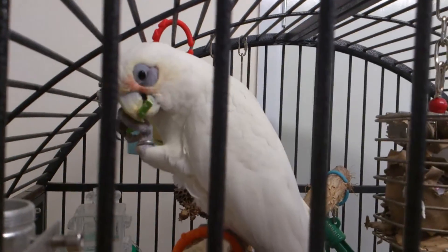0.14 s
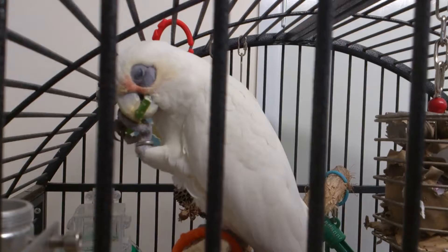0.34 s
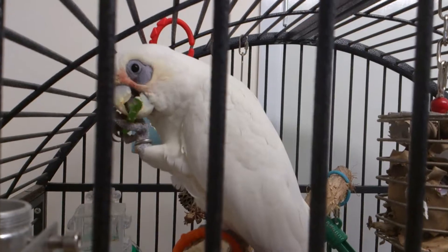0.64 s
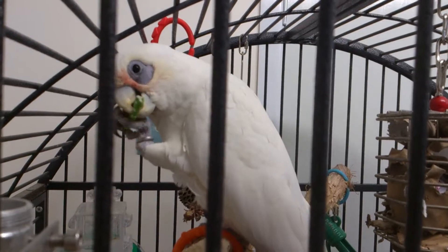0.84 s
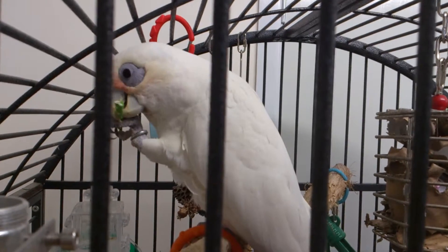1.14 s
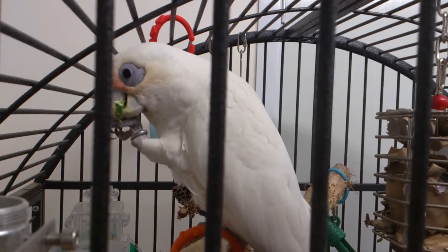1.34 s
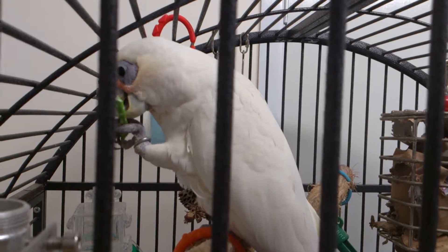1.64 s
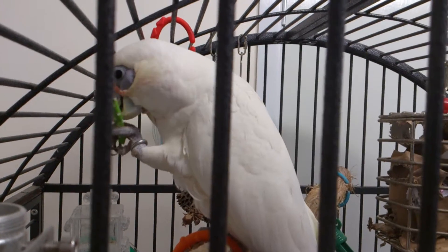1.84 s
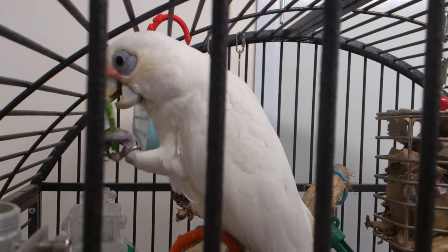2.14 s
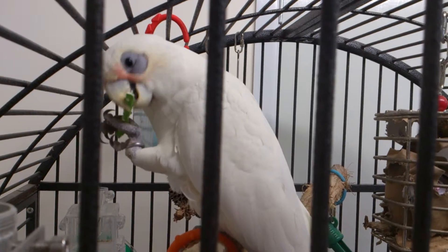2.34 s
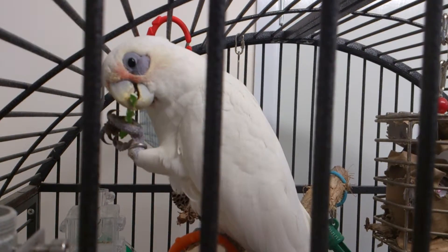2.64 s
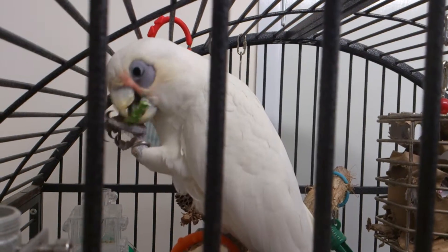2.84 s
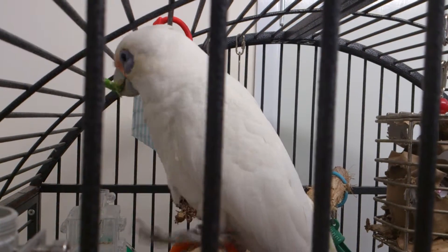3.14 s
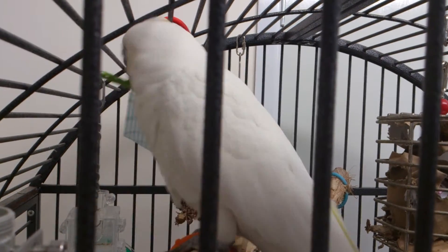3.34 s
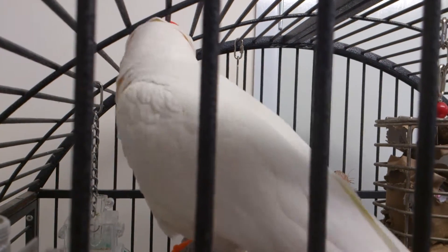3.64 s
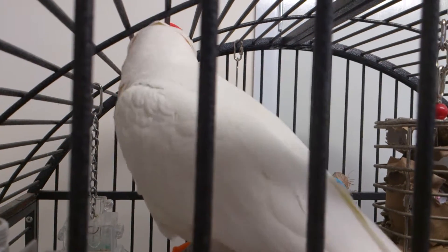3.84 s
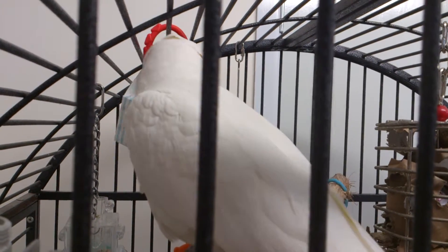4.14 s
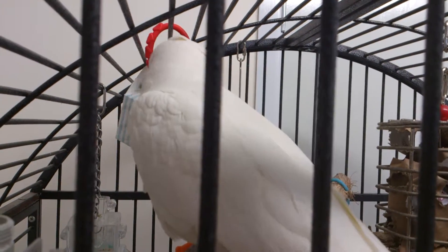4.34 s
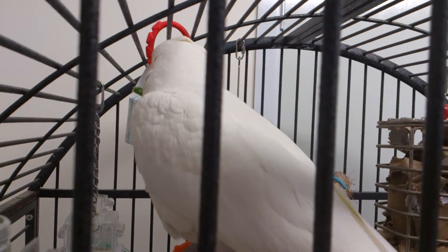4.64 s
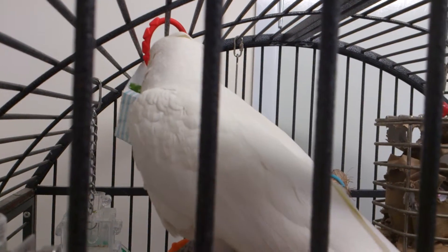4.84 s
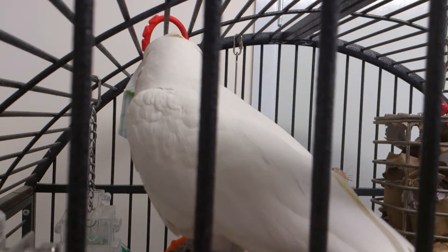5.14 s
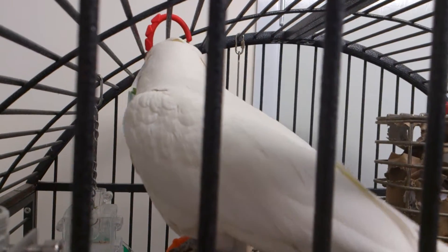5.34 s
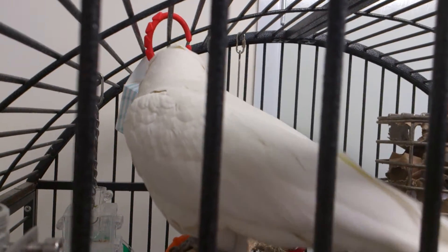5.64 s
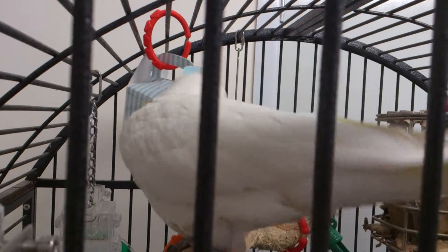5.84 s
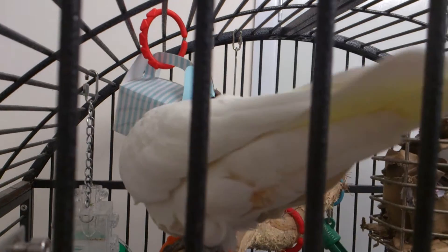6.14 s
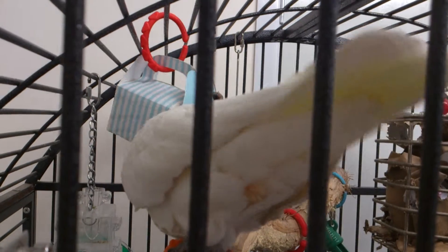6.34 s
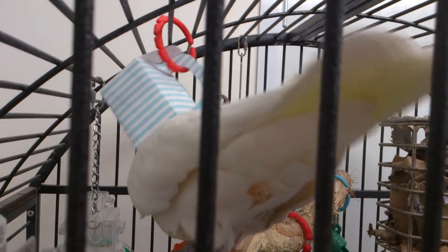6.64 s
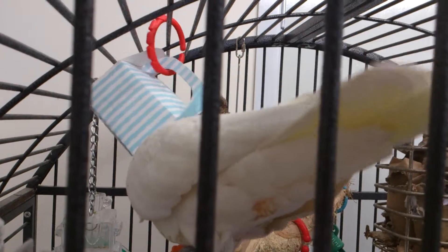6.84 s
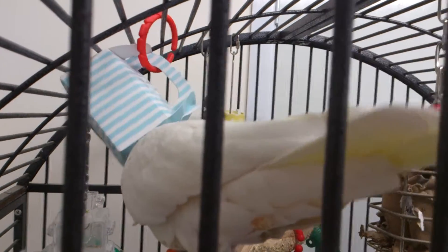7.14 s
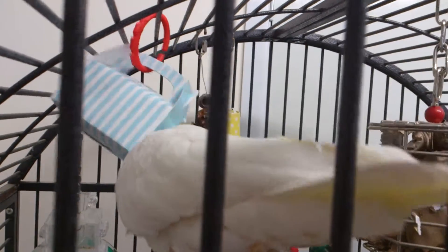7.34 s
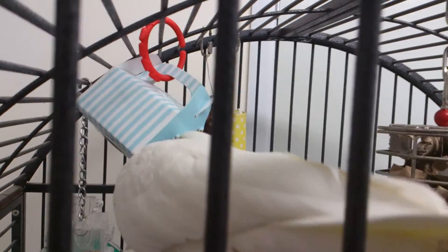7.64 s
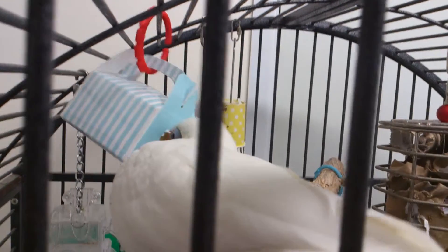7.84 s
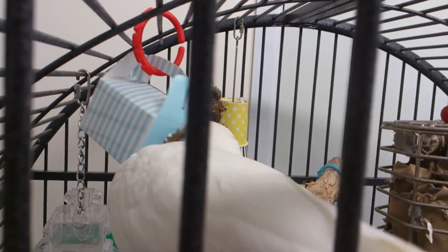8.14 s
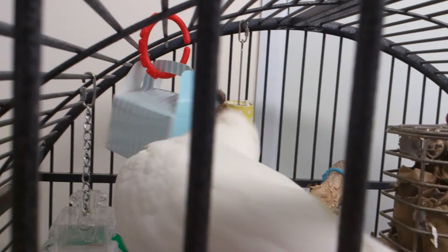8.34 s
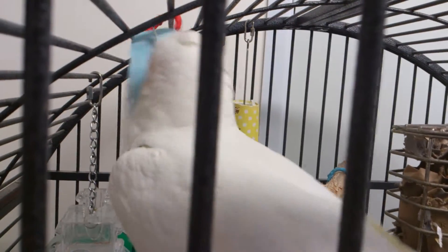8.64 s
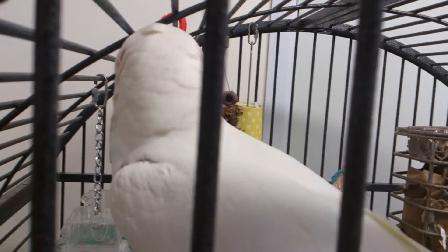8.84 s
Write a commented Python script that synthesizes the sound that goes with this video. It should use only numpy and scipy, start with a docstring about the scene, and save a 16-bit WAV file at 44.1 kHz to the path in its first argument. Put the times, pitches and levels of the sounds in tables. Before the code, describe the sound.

A caged parrot nibbles with small crisp beak clicks while another bird squeaks piercingly four times; then it snaps and knocks a hanging card box.

```python
"""A caged parrot nibbles a leaf while another bird, further off in a hard-walled room, gives four piercing squeaks:
two voices whistle and modulate each other. A toy creaks in narrow bands of noise; the nibbling is bursts of noise.
The parrot turns to a hanging card box, snaps at it, slams it once and knocks it about: duller, longer bursts.
Near the end the swinging box rustles in dense tiny creases and its chain jingles faintly in decaying sines.
Room air and a distant fan, both shaped noise, make a steady floor throughout."""
import sys
import numpy as np
from scipy import signal
from scipy.fft import rfft, irfft
from scipy.io import wavfile
from scipy.ndimage import uniform_filter1d, minimum_filter1d

SR = 44100
rng = np.random.default_rng(int(sys.argv[2]) if len(sys.argv) > 2 else 0)


def persist_wave(psi):
    """Save psi, clipped to +-1, as 16-bit WAV."""
    counts = np.round(np.clip(psi, -1, 1) * 32767).astype(np.int16)
    wavfile.write(sys.argv[1], SR, np.atleast_2d(counts).T)


N = 396900


def from_db(db):
    """Decibels to gain."""
    return 10 ** (np.asarray(db) / 20)


def rms_one(x):
    """Scale to rms 1."""
    return x / np.sqrt(np.mean(x ** 2) + 1e-20)


def peak_one(x):
    """Scale so that the loudest millisecond has rms 1."""
    return x / np.sqrt(uniform_filter1d(x ** 2, size=44).max())


def at_hz(points, hz):
    """Read a (frequency, value) table on a log frequency axis."""
    table_hz, values = np.array(points).T
    return np.interp(np.log(hz), np.log(table_hz), values)


def colour(x, spectrum):
    """Shape the spectrum of a sound by a (f/Hz, level/dB) curve, then scale to rms 1."""
    size = len(x)
    hz = np.maximum(np.arange(size // 2 + 1) * SR / size, 10)
    return rms_one(irfft(rfft(x) * from_db(at_hz(spectrum, hz)), size))


def butterworth(x, order, hz, kind="low"):
    """Smooth low, high or band pass."""
    return signal.sosfilt(signal.butter(order, hz, kind, fs=SR, output="sos"), x)


def resonance(x, hz, width_hz):
    """Two-pole band-pass, gain about 1 on top."""
    r = np.exp(-np.pi * width_hz / SR)
    zeros = [(1 - r * r) / 2, 0, (r * r - 1) / 2]
    poles = [1, -2 * r * np.cos(2 * np.pi * hz / SR), r * r]
    return signal.lfilter(zeros, poles, x)


def steep_resonance(x, hz, width_hz):
    """The same resonance twice in a row, for steep skirts."""
    return resonance(resonance(x, hz, width_hz), hz, width_hz)


def add(out, s, sound):
    """Mix a sound in at time s."""
    i = round(s * SR)
    out[i:i + len(sound)] += sound[:N - i]


def air():
    """Broad room noise with the soft hum bands of a fan: noise through narrow resonances."""
    # colour of the room air: (f/Hz, relative level/dB)
    air_colour = [(25, -20), (54, 1), (106, -5), (182, -2), (272, -0.5), (491, -9.5), (609, -6.5),
                  (1160, -11.5), (2270, -13), (3300, -18.5), (4940, -16), (8220, -30), (10200, -22.5),
                  (12000, -34), (13500, -37), (15200, -41)]
    # hum bands of the fan: (f/Hz, width/Hz, level/dB)
    fan_bands = [(189.6, 6.1, -62.5), (241.3, 12, -79), (284, 14, -63.5), (378.7, 31, -62), (611, 1.6, -65)]
    hum = sum(from_db(db) * rms_one(resonance(rng.standard_normal(N), hz, width)) for hz, width, db in fan_bands)
    return from_db(-48) * colour(rng.standard_normal(N), air_colour) + hum


def room(x):
    """Dense wall echoes that build up over some ms and die band by band, about equally strong at every
    frequency."""
    # time the echoes take to fall by 60 dB: (f/Hz, t60/s)
    echo_t60 = [(300, 0.32), (1000, 0.82), (3000, 0.78), (5000, 0.68), (10000, 0.5), (15000, 0.465)]
    build_up_s = 0.0017
    t, echoes = np.arange(SR) / SR, 0
    edges = 100 * 2 ** np.arange(0, 7.6, .5)   # half-octave bands from 100 Hz
    for low, high in zip(edges, edges[1:]):
        t60 = at_hz(echo_t60, np.sqrt(low * high))
        fade = from_db(-60 * t / t60) * (1 - np.exp(-t / build_up_s))
        band = butterworth(rng.standard_normal(SR), 2, [low, high], "band")
        echoes = echoes + band * fade / np.sqrt(np.sum(fade ** 2))
    return signal.fftconvolve(x, echoes)[:N]


def rough_notes(rows):
    """Short swells of noise through narrow resonances; rows of (t/s, length/s, f/Hz, width/Hz, level/dB)."""
    out = np.zeros(N)
    for s, length, hz, width, db in rows:
        band = steep_resonance(rng.standard_normal(8192), hz, width)[4096:]   # skips the filter's build-up
        progress = np.minimum(np.arange(4096) / SR / length, 1)
        swell = np.sin(np.pi * progress ** 1.083) ** 2
        add(out, s, from_db(db) * peak_one(band * swell))
    return out


def creaks():
    """A toy creaks further off: rough narrow bands of noise sound together."""
    # bands of the creaks: (t/s, length/s, f/Hz, width/Hz, level/dB)
    creak_bands = [(5.296, 0.025, 3240, 351, -38.5), (5.296, 0.024, 4740, 403, -42),
                   (8.715, 0.033, 3700, 150, -41.5), (8.72, 0.048, 3990, 149, -43.5),
                   (8.715, .05, 5280, 200, -44), (8.715, 0.032, 6190, 250, -43.5),
                   (8.72, 0.047, 2350, 298, -44)]
    return rough_notes(creak_bands)


def squeaks():
    """Both sides of the syrinx whistle and modulate each other; overtones grow with effort; air rasps along."""
    # squeaks: (t/s, length/s, upper voice f/Hz, lower voice f/Hz, level/dB, trend/dB per s,
    #           overtone step/dB, lower voice step/dB, grace note level/dB)
    calls = [(.125, 0.049, 5131, 2374, -11, -81.5, 4.5, -2.1, -13),
             (2.098, 0.064, 5003, 2310, -15.5, 50, 0, -1, -17),
             (3.672, .063, 5082, 2338, -13, 5, 0, -0.4, -28.5),
             (6.104, 0.058, 4987, 2337, -17, 67, -0.5, -2, -18)]
    # mixed tones of the two voices: (multiple of upper f, multiple of lower f)
    mixes = [(1, 0), (2, 0), (3, 0), (0, 1), (1, -1), (1, 1), (2, -1), (2, -2), (2, 1), (3, -1)]
    # basic strength of each mixed tone, before effort and voice balance: level/dB
    mix_levels = [3.5, -0.5, -58.5, -30.5, -26.5, -12.5, -19.5, -30.5, -30, -35.5]
    # air rushing past the syrinx: (f/Hz, relative level/dB)
    rasp_colour = [(2100, -31), (2600, -12.5), (3500, -18.5), (4600, -8), (5500, 10), (6000, -12),
                   (6470, 0), (7000, -12), (8300, -7.5), (9400, 2.5), (10600, -4), (12000, -12.5),
                   (14000, -24)]
    # rms pitch wobble of the upper and the lower voice: (share of f)
    wobble_share = [
        [0.0066],
        [0.033],
    ]
    wobble_top_hz, rasp_db, growth = 240, -11, 0.6   # growth: dB per overtone step and dB of effort
    swell_from_db, swell_s, release_db_per_s = -46.5, .007, 2499.5   # fast swell, hold, abrupt end
    hook_hz, hook_s, lower_joins_s = 228, 0.0065, 0.016   # the upper voice starts sharp, the lower joins late
    grace_lead_s, grace_s, grace_hz, grace_width_hz = .004, .05, 5475, 390

    out, t = np.zeros(N), np.arange(8192) / SR
    for s, length, upper_hz, lower_hz, level_db, trend_db, octave_db, lower_db, _ in calls:
        swell_db = swell_from_db * np.exp(-t / swell_s)
        effort_db = swell_db + trend_db * t - release_db_per_s * np.maximum(t - length, 0)

        drift = butterworth(rng.standard_normal((2, 8192)), 2, wobble_top_hz)
        wobble = 1 + np.array(wobble_share) * rms_one(drift)
        pitch_hz = np.array([upper_hz + hook_hz * np.exp(-t / hook_s), lower_hz + 0 * t])
        upper, lower = 2 * np.pi * np.cumsum(pitch_hz * wobble, axis=1) / SR   # phases

        step_db = octave_db + growth * effort_db
        joined_db = lower_db - 25 * np.exp(-(t / lower_joins_s) ** 3)
        tones = 0
        for (m, n), mix_db in zip(mixes, mix_levels):
            tone_db = mix_db + max(m - 1, 0) * step_db + abs(n) * joined_db
            tones = tones + from_db(tone_db) * np.sin(m * upper + n * lower)

        rasp = from_db(rasp_db) * colour(rng.standard_normal(8192), rasp_colour)
        add(out, s, (np.sqrt(2) * tones + rasp) * from_db(level_db + effort_db))

    # each squeak opens with a rough, higher grace note
    graces = [(s - grace_lead_s, grace_s, grace_hz, grace_width_hz, db) for s, *_, db in calls]
    return out + rough_notes(graces)


def chain():
    """A few link touches per rattle, each striking every metal mode with its own strength."""
    # rattles: (t/s, level/dB, brightness/dB per octave around 6000 Hz)
    rattles = [(8.06, -62, 6), (8.161, -59, 6), (8.285, -51.5, 4.5)]
    # ringing modes of the links: (f/Hz, relative level/dB, t60/s)
    link_modes = [(4220, -3, .15), (5803, -3, .25), (6400, -7, .2), (7122, -8, .15), (7838, -1, .25),
                  (8107, -4, .2), (8870, 0, .12), (9600, -2, .12), (10100, -2, .15), (10330, -4, .15),
                  (11550, -9, .15), (12200, -10, .1)]
    out, t = np.zeros(N), np.arange(SR // 2) / SR
    for s, db, bright_db in rattles:
        for touch_s in np.linspace(0, .04, num=4):
            ring = 0
            for hz, mode_db, t60 in link_modes:
                strike_db = mode_db + bright_db * np.log2(hz / 6000) + rng.normal(0, 3)
                ring = ring + from_db(strike_db - 60 * t / t60) * np.sin(2 * np.pi * hz * t)
            add(out, s + touch_s, from_db(db) * ring)
    return out


def rustle():
    """Card and feathers crease as the box swings: dense uneven ticks of one colour, rising fast and fading."""
    # swings of the box: (t of the peak/s, level/dB, fade/dB per s)
    swing_rows = [(8.052, -47, 120), (8.178, -49.5, 160), (8.302, -42.5, 190), (8.49, -52, 400),
                  (8.59, -50, 371), (8.668, -55, 302), (8.724, -41.5, 200), (8.946, -46, 74)]
    # colour of one crease: (f/Hz, relative level/dB)
    crease_colour = [(880, -32.5), (1500, -9.5), (3340, -11), (3860, -9), (4410, -2.5), (6010, -6.5),
                     (6810, -17.5), (9820, -3), (15000, -28)]
    creases_per_s, rise_db_per_s = 2600, 699.5
    t, swings = np.arange(N) / SR, 0
    for s, db, fade_db in swing_rows:
        drop_db = np.where(t < s, rise_db_per_s * (s - t), fade_db * (t - s))
        swings = swings + from_db(db - drop_db)
    hits = rng.random(N) < creases_per_s / SR
    sizes = from_db(3.5 * np.minimum(rng.exponential(1, N), 3))
    creases = hits * sizes * rng.choice([-1, 1], N)
    return swings * colour(creases, crease_colour)


def burst(t60, rise_ms, size=4096):
    """A crush of fibres: noise that swells and dies; sudden ones open with one clean crack."""
    t = np.arange(size) / SR
    swell = 1 - np.exp(-(1000 * t / max(rise_ms, .02)) ** 2)
    crush = rng.standard_normal(size) * from_db(-60 * t / max(t60, .001)) * swell
    # the crack outweighs the crush by up to 1 dB and weakens the slower the rise
    crush[0] = from_db(1) * np.exp(-rise_ms) * np.sqrt(np.sum(crush ** 2))
    return crush


def knocks():
    """Card box, perch and toys take dull blows: crushed noise in broad bands around their centres."""
    # knock bands; the knock at 7.37 s has two, a middle and a low one:
    # (t/s, peak level/dB, centre f/Hz, t60/s, rise/ms)
    knock_bands = [(.880, -33.5, 1194, 0.033, 0.2), (1.434, -47, 3050, .04, 2.7),
                   (6.455, -37.5, 880, .077, 6.1), (6.562, -40.5, 1370, .038, 1.68),
                   (6.609, -37, 1910, 0.021, .2), (6.648, -36, 1170, 0.11, 3),
                   (6.922, -40, 1750, 0.022, 3.2), (7.065, -33, 1074, 0.064, 5.8),
                   (7.240, -41.5, 860, .024, 2.6), (7.372, -26.5, 1880, 0.035, 0.48),
                   (7.373, -34.5, 870, 0.1, 0.39), (7.435, -43, 796, 0.028, 3.),
                   (7.678, -41, 810, .023, 2.1), (8.050, -35.5, 830, 0.025, 4.3),
                   (8.140, -42, 677, 0.042, 8.), (8.285, -42.5, 880, 0.063, 8.5),
                   (8.444, -46, 880, .04, 5.), (8.585, -41.5, 1140, .054, 5.7),
                   (8.700, -33.5, 810, 0.17, 6), (8.763, -41, 1040, .086, 7.1)]
    # the one slam of the box, several bands together: (centre f/Hz, peak level/dB, t60/s, rise/ms)
    slam_bands = [(300, -27.5, .094, 0.91), (720, -15, 0.034, 0.6), (1710, -26.5, 0.057, .2),
                  (2450, -27, 0.12, 0.12), (5270, -12, 0.02, 0.077)]
    slam_s, width_share = 6.6815, 1.28   # width of each filter pass as a share of the centre
    out = np.zeros(N)
    rows = [(s, hz, db, t60, rise_ms) for s, db, hz, t60, rise_ms in knock_bands]
    rows += [(slam_s, *band) for band in slam_bands]
    for s, hz, db, t60, rise_ms in rows:
        band = steep_resonance(burst(t60, rise_ms), hz, width_share * hz)
        add(out, s, from_db(db) * peak_one(band))
    return out


def snap(t60, rise_ms):
    """The bright top of one beak snap: one crush rings through a few broad resonances."""
    # resonances of the top: (f/Hz, width/Hz, relative level/dB)
    top_bands = [(6250, 840, 0.5), (9880, 3600, 4.5), (13000, 4000, -15.5)]
    crush = burst(t60, rise_ms)
    return peak_one(sum(from_db(db) * steep_resonance(crush, hz, width) for hz, width, db in top_bands))


def beak():
    """Sudden snaps and softly swelling rubs, each a bright top and a duller body, over a random faint crackle."""
    # sudden snaps on leaf and card: (t/s, peak level of the top/dB, body relative to the top/dB)
    snap_rows = [(0.0356, -41, -16), (0.568, -29.5, 5), (0.785, -38, -30), (0.879, -13.5, -9.5),
                 (1.037, -45, -9), (1.238, -40.5, -23), (1.328, -44.5, 3), (1.3365, -54, 11),
                 (1.490, -48.5, -10.5), (1.509, -38.5, -5), (1.637, -25, -36), (1.8078, -46, 2),
                 (1.8956, -49, -8), (2.0398, -43, -16), (3.1647, -40, -6.5), (3.3831, -47.5, -9),
                 (5.915, -45, -9.5), (6.012, -34.5, 4), (6.6102, -20.5, -1), (7.0394, -38, -5),
                 (7.371, -32, 2.5), (7.6792, -48, 12), (7.8033, -55, 15), (7.8487, -51.5, 13.5)]
    # rubs, swelling softly: (t/s, peak level of the top/dB, body relative to the top/dB, rise/ms)
    rub_rows = [(.775, -44, -25, 6.8), (1.310, -51, -24, 6.), (1.575, -57, -5, 5.7),
                (2.588, -43.5, -16, 12), (2.618, -52, 0.6, 3.3), (2.863, -50, -10.1, 2.5),
                (2.922, -47, -13, 8.), (2.942, -40.5, -11, 3.), (3.063, -42, -18, 2.5),
                (3.992, -48, -12, 4.), (4.653, -40, -10.1, 1.5), (4.82, -51.5, -18, 9.),
                (5.297, -50, 9.5, 2.1), (6.452, -44, 3, 6.9), (6.682, -24, -20.1, 1.2),
                (6.860, -43, -20.1, 2.5), (6.921, -51, 9, 3.7), (7.066, -48, 5, 4.3),
                (7.432, -45, -15, 4.1), (7.519, -52, -14, 2.5), (7.741, -49, -12, 4.1),
                (8.044, -41, 0.5, 7.1)]
    snap_rise_ms, leaf_t60_s, card_t60_s = .09, .04, 0.099   # the card crushes longer than the leaf
    card_from_s = 5.95   # the bird has turned to the card
    crackles_per_s, crackle_db = 37, -60   # level of the faintest crackle
    out = np.zeros(N)
    for s, db, body_db, rise_ms in [(*row, snap_rise_ms) for row in snap_rows] + rub_rows:
        t60 = leaf_t60_s if s < card_from_s else card_t60_s
        body = peak_one(resonance(burst(t60, rise_ms), 4600, width_hz=2900))
        add(out, s, from_db(db) * (snap(t60, rise_ms) + from_db(body_db) * body))
    hits = rng.random(N) < crackles_per_s / SR
    grains = hits * from_db(crackle_db + 3.0 * np.minimum(rng.exponential(1, N), 3))
    return out + signal.fftconvolve(grains, snap(0.0045, rise_ms=0.43))[:N]


def scene():
    """Beak and box sound close with some echo, the far bird and toy ring in the room, over the air and fan."""
    near_top_hz = 13000   # treble limit of the near sounds
    bites = butterworth(beak(), 4, near_top_hz)
    box = butterworth(knocks() + rustle() + chain(), 4, near_top_hz)
    far = squeaks() + creaks()
    bites_dull = butterworth(bites, 1, 6015)   # the close beak sends less treble to the walls
    box_thin = butterworth(box, 1, 593, "high")   # the walls return little bass of the box
    echo = room(from_db(-2) * bites_dull + from_db(-3.5) * box_thin + far)
    return (bites + box + from_db(0.5) * far + echo + air())[None]


def record(dry):
    """Microphone bass cut, a limiter that turns down around peaks over full scale, and a steep top cut."""
    x = butterworth(dry, 4, 39.5, "high")
    needed_gain = 1 / np.maximum(np.abs(x), 1)
    gain = uniform_filter1d(minimum_filter1d(needed_gain, size=257), size=257)
    return signal.sosfilt(signal.ellip(10, .5, 60, 15400, fs=SR, output="sos"), gain * x)


dry = scene()
out = record(dry)
persist_wave(out)
```